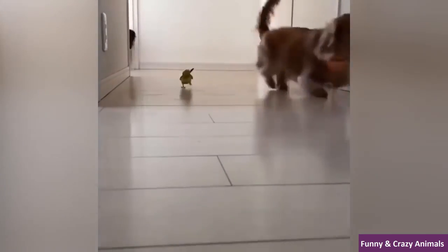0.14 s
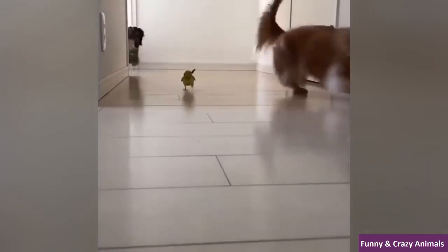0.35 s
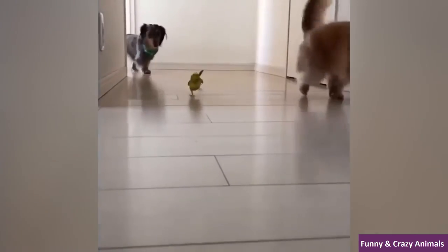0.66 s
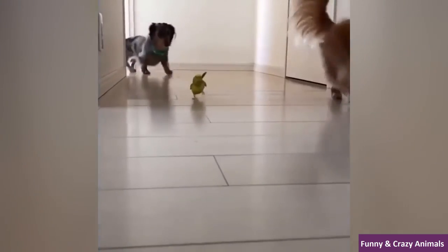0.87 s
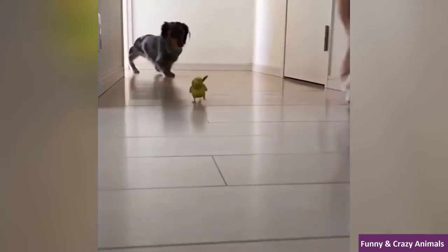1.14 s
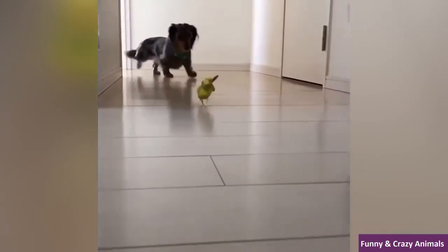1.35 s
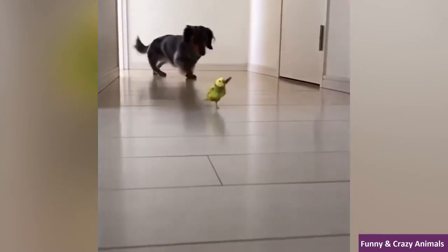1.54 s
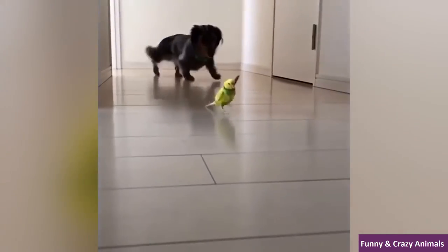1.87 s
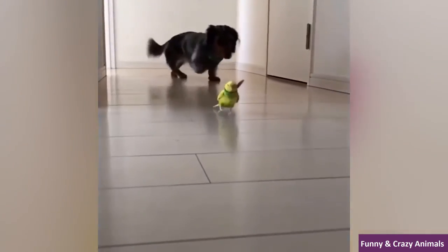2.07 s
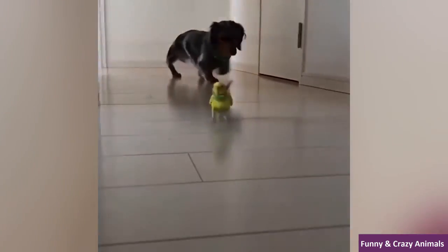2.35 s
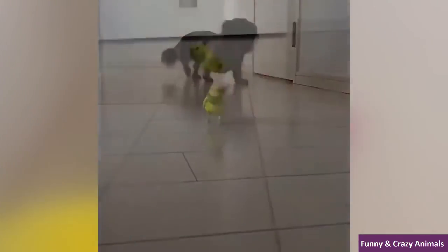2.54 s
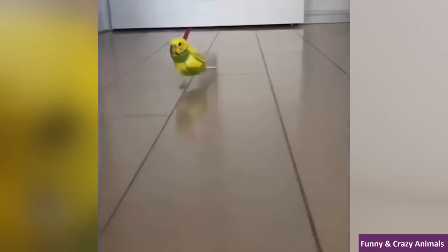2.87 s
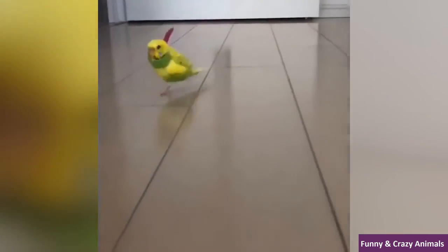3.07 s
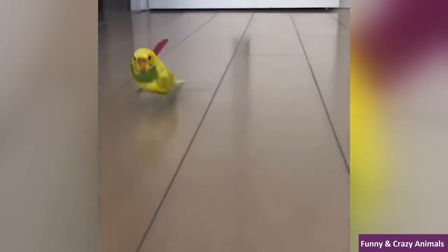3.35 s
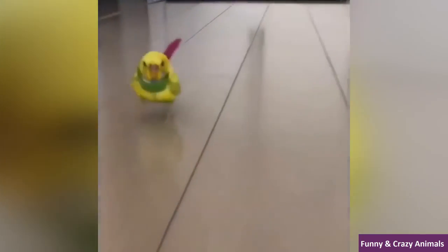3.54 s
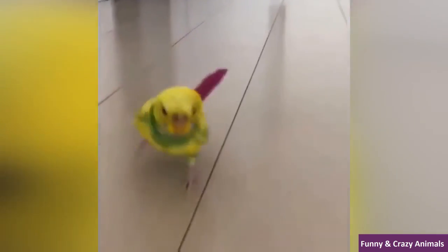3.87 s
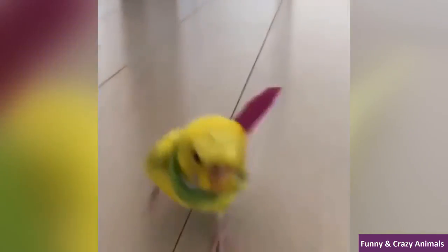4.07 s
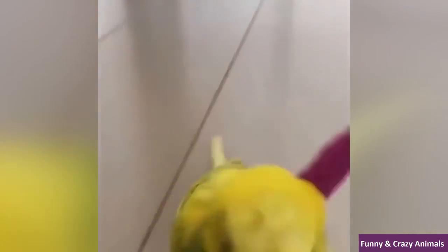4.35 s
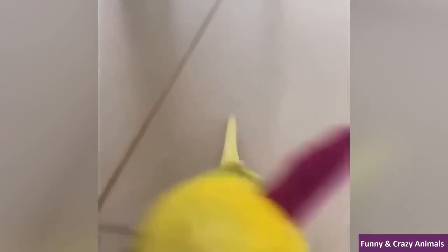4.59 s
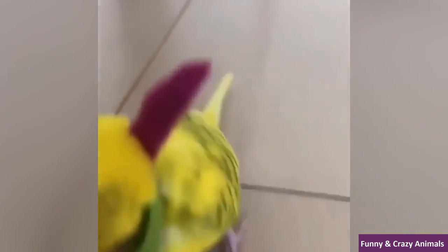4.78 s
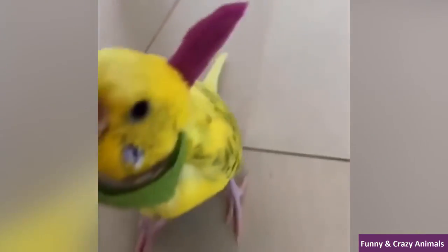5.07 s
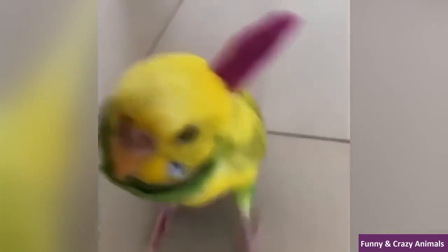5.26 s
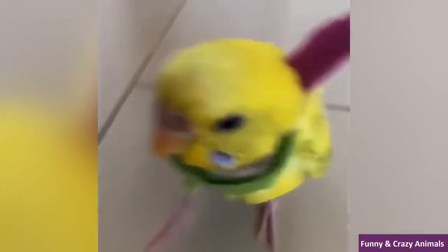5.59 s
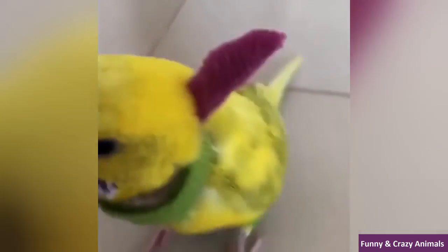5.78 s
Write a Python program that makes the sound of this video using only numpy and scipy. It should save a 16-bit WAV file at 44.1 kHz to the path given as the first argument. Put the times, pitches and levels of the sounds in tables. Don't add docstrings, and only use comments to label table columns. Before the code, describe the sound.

From 0 to about 3 seconds, a small dog trots about a bare indoor hall. Its hard claws click on the floor in uneven clusters, light at first and stronger from about 0.6 seconds, with little scrapes, nicks and soft pad thuds. A short bright reverberation surrounds them, over airy room noise and a faint mains hum. From about 2.3 seconds the hall fades, and near 3.0 there is a momentary dropout. Then a quieter room with a low, steady appliance tone takes over. A small parrot patters towards a phone on the floor, about a dozen tiny steps per second, each a crisp nail tick with a soft, hollow, falling tap through the floor. Faint toe drags occur early. Steps grow louder around 4 to 4.8 seconds, then stop after 4.9, leaving sparse faint ticks and weight shifts, one clearer step near 5.6, and the hum dying away.

```python
import sys
import numpy as np
from scipy import signal
from scipy.fft import rfft, irfft
from scipy.io import wavfile
from scipy.ndimage import uniform_filter1d

SR = 44100
rng = np.random.default_rng(int(sys.argv[2]) if len(sys.argv) > 2 else 0)


def natural_amplitude(level_db):
    exponent = np.asarray(level_db, float) / 20
    return 10 ** exponent


def persist_wave(psi):
    counts = np.round(np.clip(psi, -1, 1) * 32767).astype(np.int16)
    wavfile.write(sys.argv[1], SR, np.atleast_2d(counts).T)


N = 261080
TIME = np.arange(N) / SR

# (frequency [Hz], density [dB per Hz])
HALL_NOISE = [(15, -32), (25, -1), (103, 1), (161, -5), (493, -8), (594, -11), (985, -15), (2440, -18.5),
              (3100, -17), (4380, -18.5), (5270, -17.5), (12400, -32), (14500, -61)]
ROOM_NOISE = [(15, -50), (25, -23), (59, -4), (90, -0.5), (130, 1), (358, -7.5), (594, -15), (800, -16),
              (2780, -27.5), (5000, -31), (10800, -35.5), (13400, -38.5), (14500, -60)]
# (frequency [Hz], width [Hz], level [dB])
HALL_HUMS = [(93.8, 4.6, -65), (198.6, 1.4, -65.5), (305.3, 28, -64), (260.3, 1.3, -70.5)]
ROOM_HUMS = [(117, 270, -102), (48.8, 5.3, -77)]
# (time [s], frequency [Hz], level [dB])
APPLIANCE = [
    (2.5, 87.2, -72.5),
    (3.169, 84.34, -66.5),
    (5.66, 82.8, -66),
    (5.92, 88.5, -79),
]
# (time [s], gain [dB])
CHANGE_DIP = [
    (2.977, 0),
    (2.984, -13),
    (3.001, -26),
    (3.007, -60),
    (3.013, -13),
    (3.03, 0),
]

# (time [s], frequency [Hz], level [dB], length [s])
TOE_SCUFFS = [
    (3.165, 1430, -70, 0.014),
    (3.246, 1460, -75.5, 0.017),
    (3.896, 1700, -76, 0.009),
]
# (time [s], level [dB])
STRAY_NAILS = [(3.0628, -53), (3.362, -48.5), (3.526, -44), (3.6927, -52), (3.9971, -57), (4.331, -47.5),
               (4.391, -51), (4.4494, -50), (4.477, -63), (4.536, -54), (4.755, -49), (4.9385, -55),
               (5.1424, -59), (5.295, -57), (5.379, -59), (5.4576, -64), (5.5103, -59), (5.5457, -51),
               (5.8013, -63), (5.831, -60), (5.9141, -56)]
# (time [s], nail tick [dB], floor [dB], pad [dB], nail in the floor [dB])
PARROT_STEPS = [(3.0463, -51, -49.5, -5.5, -13), (3.1609, -51, -50, -2, -13), (3.2443, -54, -47.5, 0, -16),
                (3.3568, -54, -48, -9, -17), (3.4327, -53, -56, -3, -8.5), (3.5378, -45, -46, -2.5, -4.5),
                (3.6052, -43, -52, 6, 0.5), (3.713, -44.5, -43, -4.5, -6), (3.7895, -46, -45.5, -9, -6.5),
                (3.8885, -48.5, -41, -8, -2), (3.977, -45, -47.5, -1.5, -3), (4.065, -42.5, -39.5, -4, -3),
                (4.145, -44, -41, 1, -6), (4.252, -39, -42, -3.5, -4.5), (4.338, -47.5, -46, -5, -9.5),
                (4.4565, -42, -41, -13, -18), (4.5428, -42, -43.5, -11, -9.5), (4.6176, -43.5, -52, 7, -1),
                (4.6607, -41, -45.5, -3, -5.5), (4.7615, -40, -50, -4, 0.5), (4.9169, -47, -57.5, 3, 0.5),
                (5.5786, -43.5, -44.5, -2.5, -6)]
# (time [s], floor level [dB])
WEIGHT_SHIFTS = [
    (4.456, -55),
    (5.15, -65),
    (5.22, -59.5),
    (5.334, -61),
    (5.3812, -58),
    (5.5765, -55),
]

# (frequency [Hz], width [Hz], level [dB])
KNOCK_MODES = [(893, 290, 0), (1427, 194, 3.5), (2070, 310, -3)]
LOW_MODES = [(3330, 420, 0), (2500, 700, -15)]
MAIN_MODES = [(5550, 380, 0), (6200, 800, -8), (4900, 700, -10)]
BRIGHT_MODES = [(7980, 2140, 4.5), (11440, 210, 5), (11450, 4900, -7.5)]
# (frequency [Hz], T60 [s])
HALL_DECAY = [(1200, 0.22), (3300, 0.25), (5700, 0.28), (9000, 0.28)]
# (time [s], peak [dB], low ring [dB], bright ring [dB], hall share [dB])
PAW_LANDINGS = [(.0521, -45, 3.5, 8, -2), (0.1324, -41.5, -1.5, -4, 1.5), (0.2346, -41, 0, 2.5, -1),
                (0.3498, -39, -0.5, 1, -0.5), (0.4185, -40, -4, 1.5, -0.5), (0.5668, -33, -9, -9, -15),
                (0.6106, -45, 13, 5, -14), (0.767, -34.5, 0, -7, -7.5), (1.0249, -31, -8, -3, -2.5),
                (1.0902, -30.5, -8.5, 0.5, -12.5), (1.1987, -32, -3, -5.5, -6), (1.2468, -31.5, 1, -3, -7),
                (1.4839, -28, -5.5, -3, -7.5), (1.658, -33.5, -3.5, -9, -8), (1.711, -38, -2, 6.5, -7),
                (1.7504, -28, -4.5, -1, -8), (1.8748, -37.5, -5, -5, -14.5), (2.0303, -29, -2, -6, -5),
                (2.194, -31.5, -10, -4, -13), (2.3122, -39, 2, 9.5, -6), (2.4511, -43, 1, -0.5, -5),
                (2.5959, -31, -1, 2.5, -5.5), (2.768, -40.5, 1.5, 4.5, -7), (2.8805, -31, -1.5, -2, -7.5)]
# (time [s], peak [dB], low ring [dB], bright ring [dB])
WET_CLAWS = [(0.0717, -47, -5, 1), (0.148, -45, -10, -18), (0.1588, -52.5, 9, -6), (0.442, -45.5, 3.5, 1),
             (0.5785, -43, 1, 0), (0.6233, -45, 2.5, 4.5), (0.8009, -39, -3.5, -3.5),
             (0.839, -48.5, -1.5, -8), (1.048, -49, -21, -16), (1.08, -41, -3, -11),
             (1.2273, -42, -18, -3), (1.5044, -46, -16, 6.5), (1.5499, -45, 3.5, 0),
             (1.8171, -51, -2, -13), (2.0688, -40.5, 0, -3.5), (2.148, -44.5, 0, 0),
             (2.2137, -55.5, 8, 11), (2.2962, -51.5, 10, -9), (2.5588, -49.5, 0.5, 1),
             (2.6294, -40.5, -17, -1.5), (2.7107, -43.5, -8, -6), (2.7348, -46.5, -22, -8),
             (2.831, -49, 11, 0), (2.8753, -37.5, -1, -2.5), (2.9085, -46, 1, 6)]
# (time [s], peak [dB], low ring [dB], bright ring [dB])
DRY_CLAWS = [(0.3644, -37, -21, 1.5), (0.7746, -37.5, 3, 6), (0.8192, -41, 3.5, -10),
             (.8465, -47, -17, -11), (.9237, -47.5, 6, -14), (1.0053, -60, -15, 18), (1.0334, -37, 4, 8),
             (1.3714, -50, -5, -1), (1.3873, -38, -9, 1), (1.6777, -49, -10, -5), (1.8619, -45.5, 5, 2),
             (1.905, -45, -16, -14), (1.956, -57, 5, -15), (2.007, -52, 5, 12), (2.02, -44.5, 5, 7),
             (2.0322, -27.5, 1.5, -6), (2.041, -39, 4, 14), (2.2019, -47, 10.5, -11),
             (2.2844, -48.5, 4, 2), (2.2927, -45, -7, 6), (2.3071, -44, 6, 1), (2.3192, -39, 10, -4),
             (2.4431, -61, 0, 7), (2.4895, -38, -2, -7), (2.5865, -41, 6.5, -15), (2.5924, -29.5, -10, -8),
             (2.6028, -43, -6, 13.5), (2.6071, -52, -8, 1)]
# (time [s], peak [dB], hall share [dB])
PAD_THUDS = [(.16, -46, -4), (0.236, -50, -8), (0.3643, -51, -2), (0.419, -44.5, 5), (.6121, -39.5, -8),
             (0.7762, -53, -14), (1.0325, -35, -9.5), (1.091, -57, -8), (1.2521, -39, 0),
             (1.4847, -39, -23), (1.711, -42, -3.5), (1.7525, -38, -7.5), (2.0345, -36, -5.5),
             (2.202, -50, -5), (2.3125, -36, -3.5), (2.5952, -37, -9.5), (2.708, -43.5, -12),
             (2.815, -41, -5), (2.8804, -37.5, -6), (2.935, -39, -12)]

HALL_DB, ROOM_DB = -54.5, -66
CHANGE_S, DISSOLVE_S, HALL_FADE_POWER, ROOM_IN_S = 3.04, 0.78, 0.63, 0.16

STEP_MID_DB, STRAY_MID_DB, MID_SCATTER_DB = -5.5, -12, 3.5
THUMP_LAG_S, TRAVEL_S, FAR_WALL_S = 0.00451, 0.00671, 0.017
SHUFFLE_PAD_DB, SHUFFLE_NAIL_DB = -1.5, -9

TOE_GAP_S, TOE_DROP_DB, TOE_SCATTER_DB = 0.0068, -13, 6.5
SCRABBLE_S, SCRABBLE_DB, SCRABBLE_SCATTER_DB = 0.055, -18.5, -4
PAW_KNOCK_DB, CLAW_KNOCK_DB, KNOCK_SCATTER_DB, PAD_OVER_CLAW_DB = -13.5, -9, 1, 30
WET_CLAW_HALL_DB, DRY_CLAW_HALL_DB, HALL_DELAY_S = 0, -17, 0.0028


def level(x, db):
    return x * natural_amplitude(db) / np.sqrt(np.mean(x ** 2))


def add(track, s, grain):
    i = int(s * SR)
    track[..., i:i + grain.shape[-1]] += grain[..., :N - i]


def ring(x, modes, detune=0.99):
    out = 0
    for k, (hz, width, db) in enumerate(modes):
        b, a = signal.iirpeak(hz * detune, hz / width, SR)
        out = out + (-1) ** k * natural_amplitude(db) * signal.lfilter(b, a, x)
    return out


def walk(rate):
    k = int(SR / rate)
    held = np.repeat(rng.standard_normal(N // k + 1), k)
    return 0.35 * uniform_filter1d(uniform_filter1d(held, k), k)[:N]


def tail(t60, onset_s, grain_db=1.5):
    t = TIME[:SR]
    sizes = np.repeat(natural_amplitude(grain_db * rng.exponential(size=SR // 64 + 1)), 64)[:SR]
    build_up = 1 - np.exp(-(t / onset_s) ** 2)
    decay = np.exp(-np.log(1000) * t / t60)
    h = rng.standard_normal(SR) * sizes * build_up * decay
    return h / np.sqrt(np.sum(h ** 2))


def scrape(t, rise_s, fall_s, drag, drag_s):
    return (1 - np.exp(-(t / rise_s) ** 2)) * (np.exp(-t / fall_s) + drag * np.exp(-t / drag_s))


def air(spectrum, hums, db):
    hz, shape_db = np.transpose(spectrum)
    bins = np.maximum(np.fft.rfftfreq(N, 1 / SR), 1)
    colour = natural_amplitude(np.interp(np.log(bins), np.log(hz), shape_db))
    noise = irfft(rfft(rng.standard_normal(N)) * colour, N)
    out = level(noise, db) * natural_amplitude(walk(6.5))
    for hum_hz, width, hum_db in hums:
        hum = ring(rng.standard_normal(N), [(hum_hz, width, 0)])
        out = out + level(hum, hum_db)
    return out


def drone():
    s, hz, db = np.transpose(APPLIANCE)
    phase = 2 * np.pi * np.cumsum(np.interp(TIME, s, hz)) / SR
    return np.sqrt(2) * natural_amplitude(np.interp(TIME, s, db)) * np.sin(phase)


def scuffs():
    out, t = np.zeros(N), TIME[:4096]
    for s, hz, db, length_s in TOE_SCUFFS:
        rub = ring(rng.standard_normal(len(t)), [(hz, 160, 0), (2.1 * hz, 400, -20)])
        add(out, s, 3.9 * level(rub, db) * scrape(t, 0.0015, length_s, 0.31, 0.12))
    return out


def bending(pad_db, nail_db, size=2048):
    hz = np.fft.rfftfreq(size, 1 / SR) + 1
    # (centre [Hz], width [octaves], level [dB])
    parts = [(260, .3, -9), (425, .43, 0), (880, .33, pad_db - 4),
             (1750, .3, nail_db - 8), (3100, .35, nail_db - 15)]
    colour = sum(natural_amplitude(db) * np.exp(-.5 * (np.log2(hz / mid_hz) / octaves) ** 2)
                 for mid_hz, octaves, db in parts)
    spread = 2 * TRAVEL_S * np.sqrt(500 * hz) - TRAVEL_S * hz
    sweep = irfft(colour * np.exp(-2j * np.pi * spread), size)
    return 68 * np.roll(sweep, 512)


def parrot_nails():
    t = TIME[:512]
    contact = scrape(t, 0.0013, 0.001, 0.19, 0.0041)
    bright = [(5560, 2250, 0.63), (8760, 3300, -0.79), (12400, 2100, 1.0)]
    ticks = [(s, db, STEP_MID_DB + floor_db + nail_db - db)
             for s, db, floor_db, _, nail_db in PARROT_STEPS]
    ticks += [(s, db, STRAY_MID_DB) for s, db in STRAY_NAILS]
    out = np.zeros(N)
    for s, db, mid_db in ticks:
        pitch = 1 + 0.042 * np.clip(rng.standard_normal(), -1.5, 1.5)
        top = ring(contact * rng.standard_normal(len(t)), bright, pitch)
        mid = ring(contact * rng.standard_normal(len(t)), [(3400, 1800, 0)], pitch)
        mid_gain = natural_amplitude(mid_db + MID_SCATTER_DB * rng.standard_normal() - 2.0)
        tick = top / np.abs(top).max() + mid_gain * mid / np.abs(mid).max()
        add(out, s, natural_amplitude(db - 1.0) * tick)
    return out


def parrot_floor():
    thumps = [(s + THUMP_LAG_S, *floor) for s, _, *floor in PARROT_STEPS]
    thumps += [(s, db, SHUFFLE_PAD_DB, SHUFFLE_NAIL_DB) for s, db in WEIGHT_SHIFTS]
    out = np.zeros(N)
    for s, db, pad_db, nail_db in thumps:
        wave = bending(pad_db, nail_db)
        second = np.roll(np.diff(wave, prepend=0) * 5, rng.integers(20, 60))
        add(out, s - 512 / SR, natural_amplitude(db) * (wave + .35 * second))
    return out


def parrot():
    nails, board = parrot_nails(), parrot_floor()
    room = signal.fftconvolve(nails, tail(0.41, 0.0093))[:N]
    slap = signal.fftconvolve(nails, tail(0.019, 0.00072))[:N]
    slap = np.roll(slap, int(FAR_WALL_S * SR))
    boards = signal.fftconvolve(board, tail(0.17, 0.0018, grain_db=-1.0))[:N]
    return nails + natural_amplitude(-8) * room + natural_amplitude(-19) * slap + board + natural_amplitude(-8.0) * boards + scuffs()


def claws():
    rows = []
    for s, db, low, top, wet in PAW_LANDINGS:
        rows.append((s, db, low, top, PAW_KNOCK_DB, wet))
        chance = np.clip(rng.standard_normal((5, 3)), -2, 2)
        for toe, (late, size, _) in enumerate(chance[:2], start=1):
            toe_s = s + TOE_GAP_S * toe * (1 + .08 * toe * late)
            toe_db = db + TOE_DROP_DB * toe + TOE_SCATTER_DB * size
            rows.append((toe_s, toe_db, low, top, PAW_KNOCK_DB, wet))
        for lag, colour in zip(rng.random(3), chance[2:]):
            loose_s = s + 2 * TOE_GAP_S + SCRABBLE_S * lag
            loose_db = db + SCRABBLE_DB - 6 * lag
            rows.append((loose_s, loose_db, *(SCRABBLE_SCATTER_DB * colour[:2]), CLAW_KNOCK_DB, DRY_CLAW_HALL_DB))
    rows += [(*row, CLAW_KNOCK_DB, WET_CLAW_HALL_DB) for row in WET_CLAWS]
    rows += [(*row, CLAW_KNOCK_DB, DRY_CLAW_HALL_DB) for row in DRY_CLAWS]
    rows = np.array(rows)
    rows[:, 4] += KNOCK_SCATTER_DB * rng.standard_normal(len(rows))
    pads = [(s, db - PAD_OVER_CLAW_DB, 0, 0, PAD_OVER_CLAW_DB, wet) for s, db, wet in PAD_THUDS]
    return np.vstack([rows, pads])


def dog():
    t = TIME[:1024]
    contact = scrape(t, 0.00054, 0.00094, 0.19, 0.009)
    near, send = np.zeros(N), np.zeros((3, 4, N))
    for i, (s, db, low_db, bright_db, knock_db, wet_db) in enumerate(claws()):
        pitch = 1 + .022 * np.clip(rng.standard_normal(4), -2, 2)
        rings = np.array([ring(contact * rng.standard_normal(len(t)), modes, pitch[k])
                          for k, modes in enumerate((KNOCK_MODES, LOW_MODES, MAIN_MODES, BRIGHT_MODES))])
        peak_db = db + np.array([[knock_db - .6], [low_db - .6], [.6], [bright_db + 2.5]])
        rings = rings * natural_amplitude(peak_db) / np.abs(rings).max(axis=1, keepdims=True)
        add(near, s, rings.sum(axis=0))
        add(send[i % 3], s + HALL_DELAY_S, natural_amplitude(wet_db) * rings)
    hall = np.zeros(N)
    for spot in send:
        for group, (_, t60) in zip(spot, HALL_DECAY):
            hall += signal.fftconvolve(group, tail(t60, 0.0032, grain_db=3.0))[:N]
    return near + natural_amplitude(5.0) * hall


def scene():
    hall_fade = np.clip((CHANGE_S - TIME) / DISSOLVE_S, 0, 1) ** HALL_FADE_POWER
    room_fade = np.clip((TIME - CHANGE_S + DISSOLVE_S) / ROOM_IN_S, 0, 1)
    dip = natural_amplitude(np.interp(TIME, *np.transpose(CHANGE_DIP)))
    hall = hall_fade * (air(HALL_NOISE, HALL_HUMS, HALL_DB) + dog())
    room = room_fade * natural_amplitude(3.0) * (air(ROOM_NOISE, ROOM_HUMS, ROOM_DB) + drone())
    return (dip * (hall + room) + parrot())[None]


def roll_off(x):
    return signal.sosfilt(signal.butter(12, 14960, fs=SR, output="sos"), x)


def record(dry):
    bass_cut = signal.butter(4, 34, "high", fs=SR, output="sos")
    top_cut = signal.ellip(6, .3, 24, 14300, fs=SR, output="sos")
    mix = signal.sosfilt(top_cut, signal.sosfilt(bass_cut, dry))
    return roll_off(mix)


dry = scene()
out = record(dry)
persist_wave(out)
```